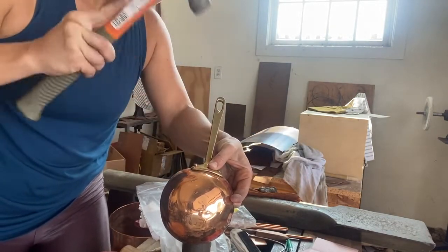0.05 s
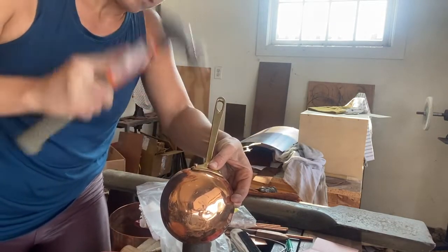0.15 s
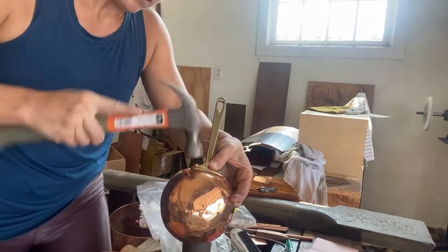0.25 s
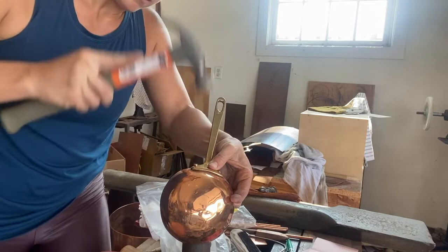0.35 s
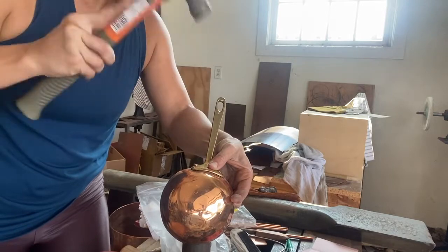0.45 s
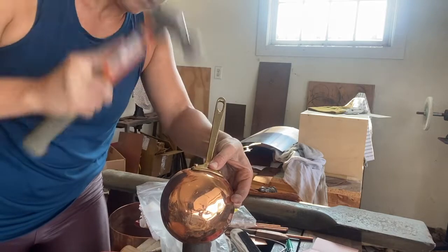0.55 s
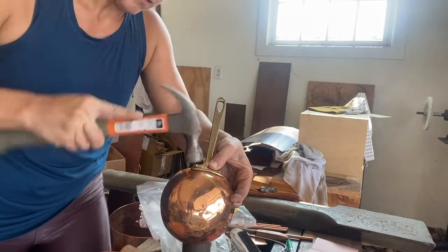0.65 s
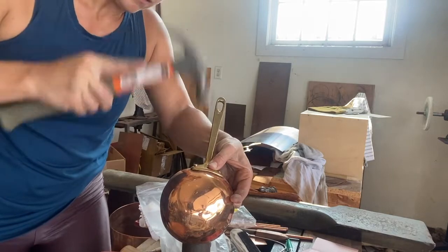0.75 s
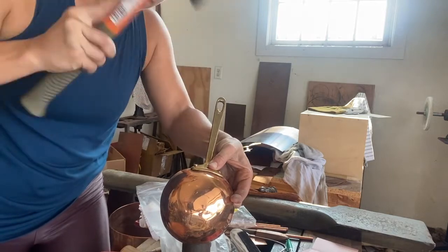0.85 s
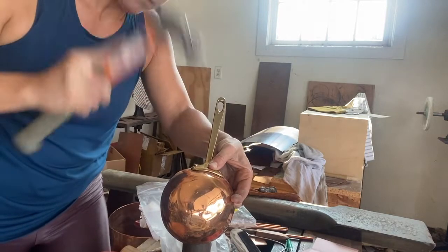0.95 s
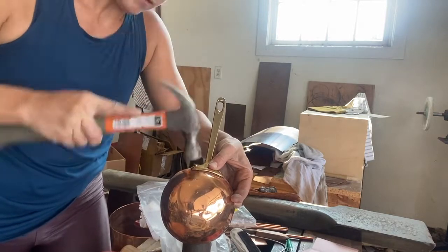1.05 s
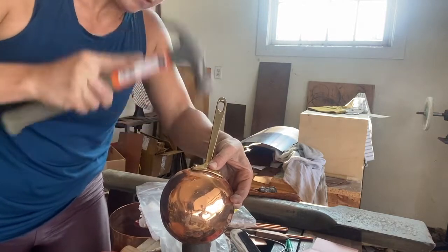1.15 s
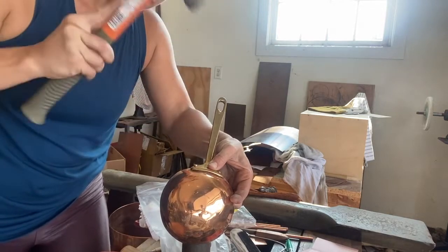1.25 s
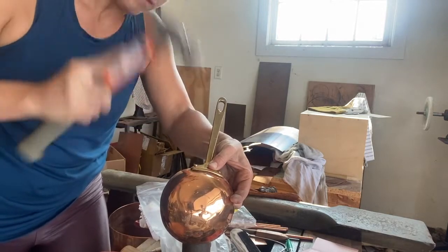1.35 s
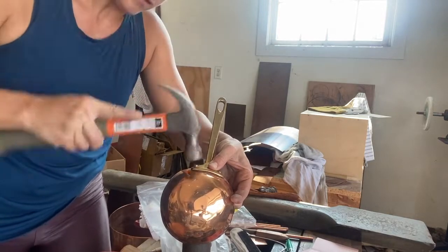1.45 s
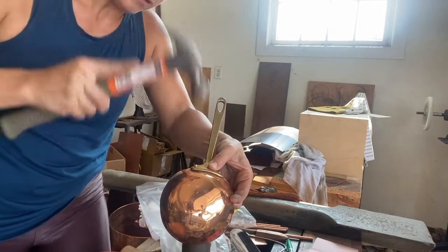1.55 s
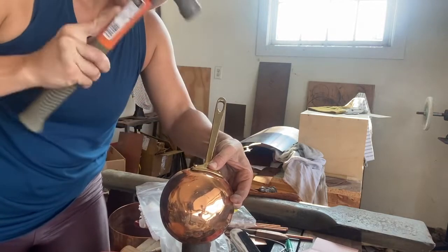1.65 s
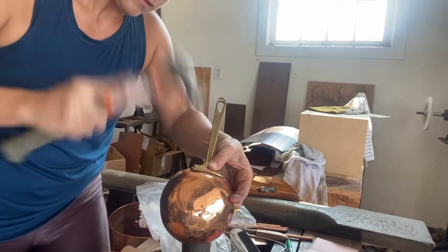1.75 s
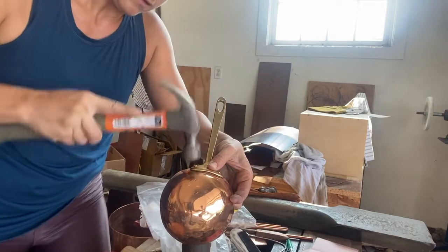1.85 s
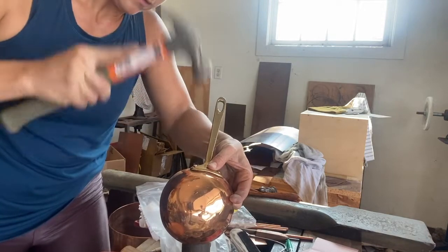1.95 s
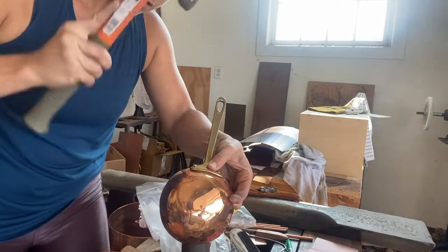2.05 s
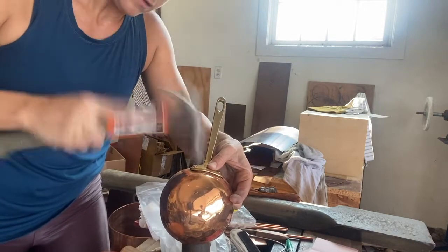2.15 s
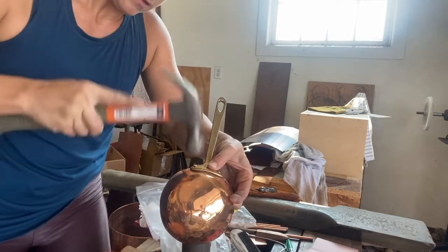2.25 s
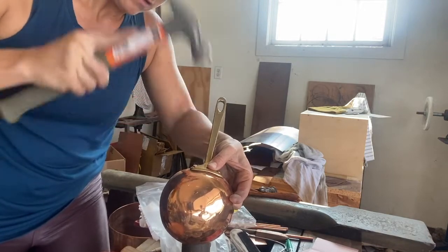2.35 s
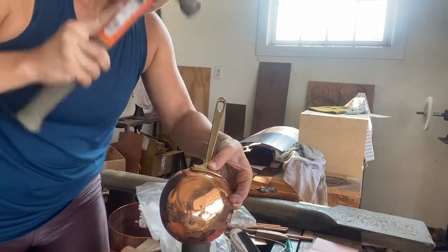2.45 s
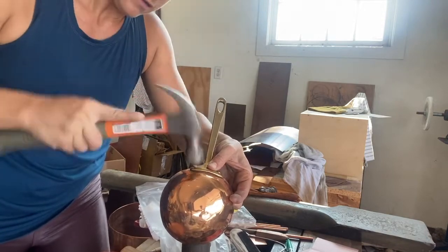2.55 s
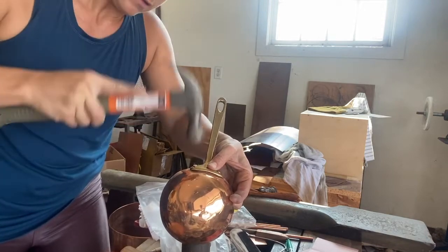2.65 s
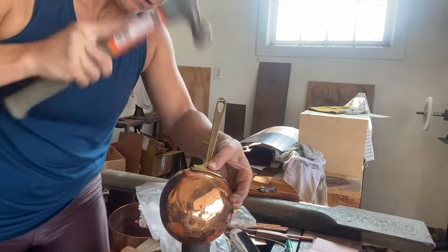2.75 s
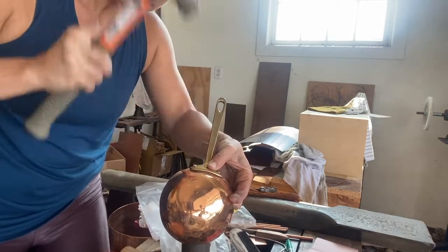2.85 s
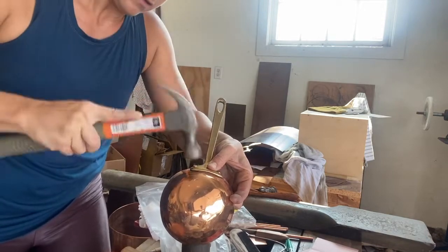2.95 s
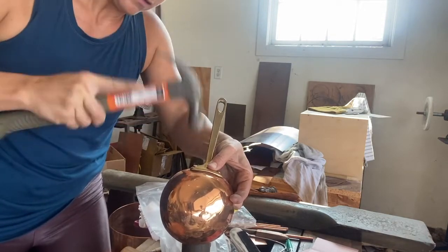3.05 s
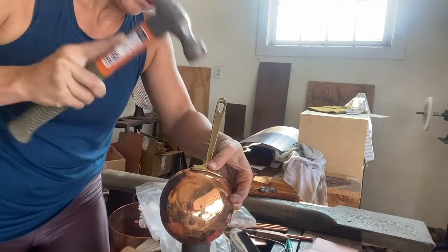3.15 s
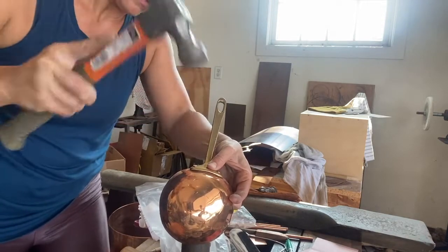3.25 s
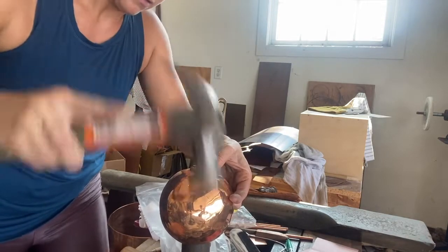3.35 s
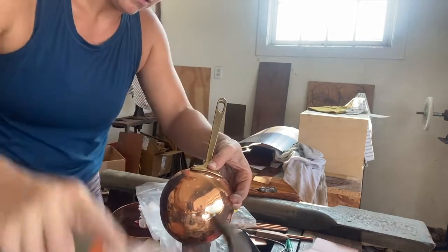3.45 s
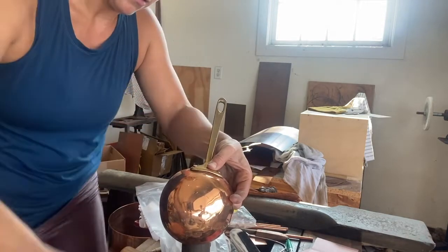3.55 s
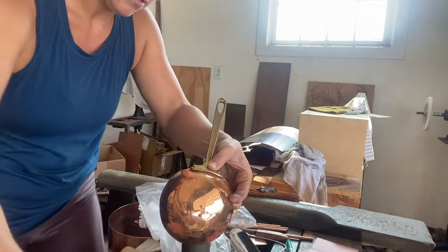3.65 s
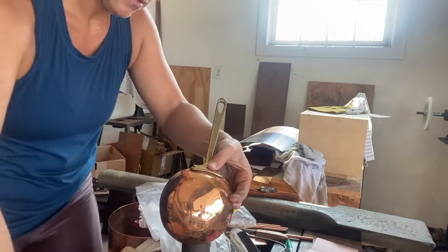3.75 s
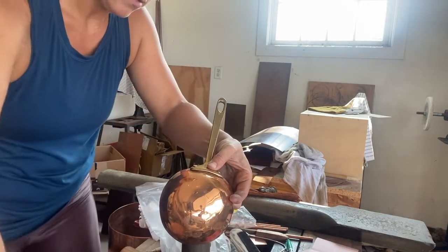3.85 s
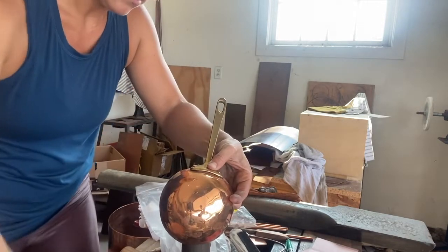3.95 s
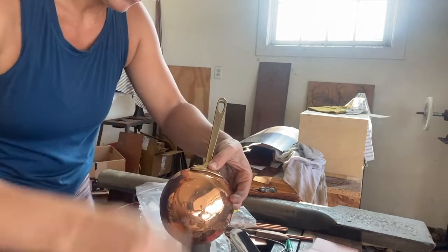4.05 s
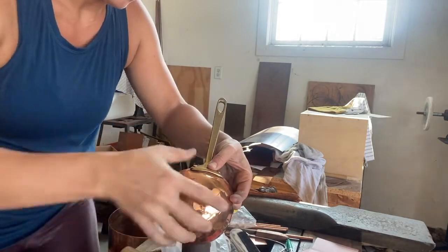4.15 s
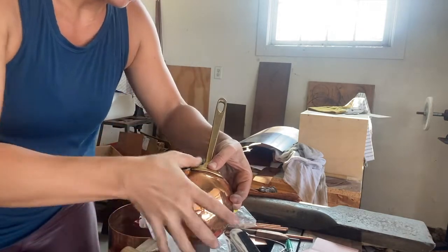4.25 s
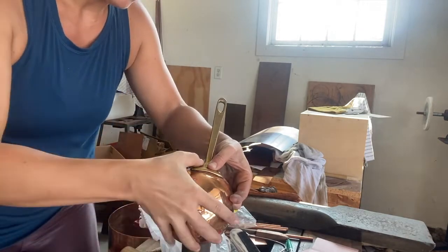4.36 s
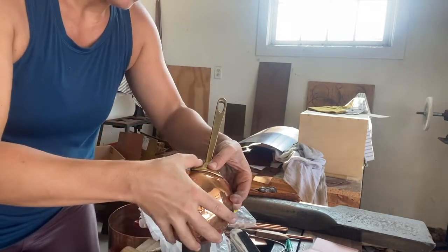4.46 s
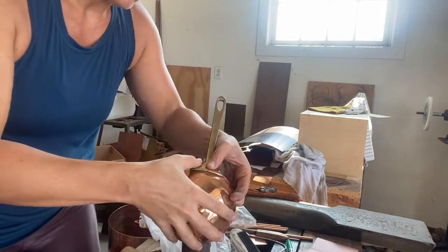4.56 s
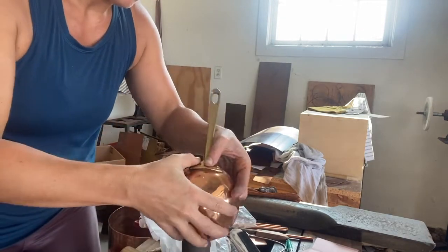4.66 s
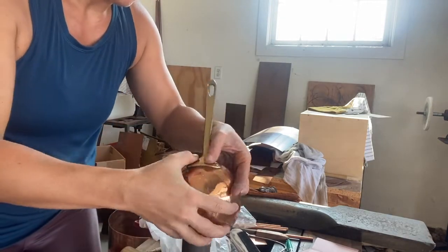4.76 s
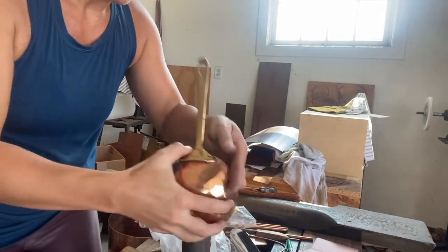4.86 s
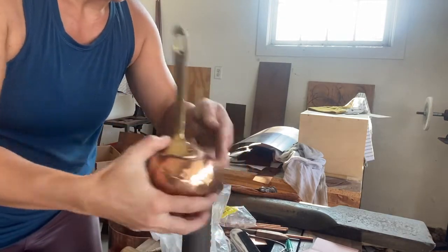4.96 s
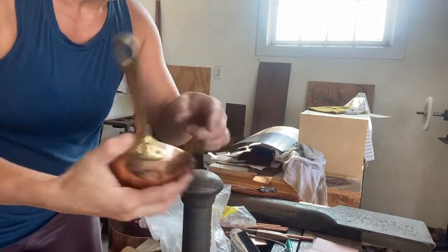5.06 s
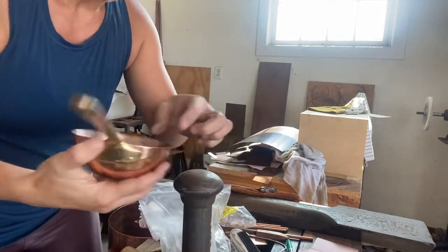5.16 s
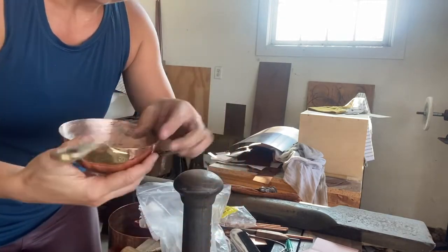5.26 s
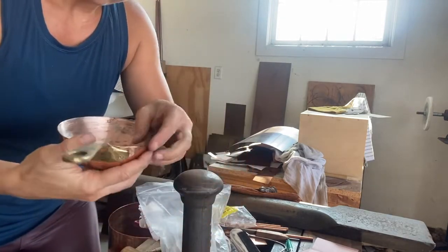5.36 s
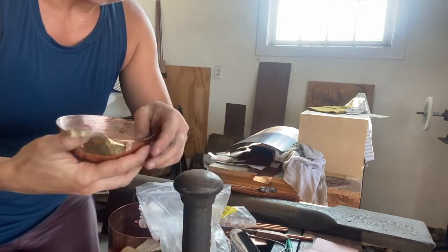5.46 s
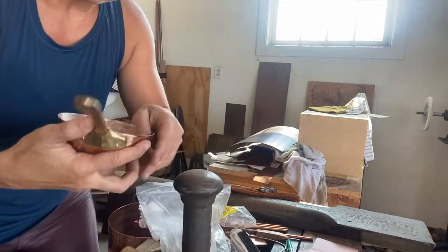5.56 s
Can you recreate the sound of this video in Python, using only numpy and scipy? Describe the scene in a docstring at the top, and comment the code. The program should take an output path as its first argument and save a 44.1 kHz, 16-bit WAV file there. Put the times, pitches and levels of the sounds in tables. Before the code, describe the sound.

A hammer strikes a rivet in a copper bowl on a steel stake, eight hard even clacks with thuds and rattling metal, then near silence.

```python
"""Even hammer blows, each a bright clack over a thud, with loose metal rattling and a workshop ringing after them.
A steel hammer sets a rivet in a copper bowl on a steel stake: noise bursts crack, damped modes ring, a sine drops.
Gain control ducks on loud peaks and lets the room swell back. Then the bowl is lifted off with faint taps,
squeaky gliding slips and soft rubs of the hand. A low throbbing hum and faint room noise lie under it all."""
import sys
import numpy as np
from scipy import signal
from scipy.fft import rfft, irfft, next_fast_len
from scipy.io import wavfile
from scipy.ndimage import uniform_filter1d, minimum_filter1d

SR = 44100
rng = np.random.default_rng(int(sys.argv[2]) if len(sys.argv) > 2 else 0)


def dump(signal):
    """Clip the signal to [-1, 1] and save it as 16-bit WAV at the path in sys.argv[1]."""
    limited = np.clip(np.atleast_2d(signal).T, -1, 1)
    pcm = np.round(limited * 32767).astype(np.int16)
    wavfile.write(sys.argv[1], SR, pcm)


N = 247695
TIME = np.arange(N) / SR  # seconds into the scene
AGE = np.arange(SR) / SR  # seconds since a contact

# All dB columns are relative: the mix adds each layer's own level.
# Hammer blows; the first falls before the scene opens. Each row: start in seconds, force in dB, clank in dB,
# thud in dB, thud rise in seconds, thud resting pitch in Hz, hammer ring in dB, floor boom in dB, knock in dB,
# bowl wall in dB, handle in dB, stake in dB, deep emphasis in Hz, bright emphasis in Hz, crush in seconds,
# room in dB.
HAMMER_BLOWS = [(-.225, 4, 2.5, 0, .01, 55, -1, -2, 0, 0, 0, 0, 400, 8500, .007, -0.5),
                (0.1766, 4, -2.5, -0.5, .0068, 75, -13.5, -3, -5, -1, -6.5, 2, 283, 8300, 0.0084, 0.5),
                (.58, 1.5, 1.5, 3, 0.0096, 55, 1, 6.5, 0.5, -2.5, -3.5, -0.5, 483, 10190, 0.0052, -1),
                (.974, 0.5, 2.5, -2, 0.013, 53.26, -6, 3, -4.5, 0.5, 1.5, 6.5, 452.7, 9970, 0.0057, 0.5),
                (1.372, -1, -0.5, 3, .0072, 47.95, 3.5, -6.5, -2, 2.5, 1.5, -10.5, 403.6, 9340, 0.0065, 0),
                (1.7531, -3.5, 1.5, 3.5, 0.0083, 46.92, -11, 6.5, -3.5, 6, 3.5, -2, 559, 8870, 0.0067, 1),
                (2.1344, -1.8, 0.5, 2.5, 0.012, 63, 0, -4.5, 1.5, 0.5, -7.5, 1.5, 480, 10100, .0075, 1),
                (2.5245, -1.5, 1.5, 2, 0.014, 67.7, -7.5, -13, 0.5, 1, 6.5, 0.5, 663, 7930, 0.0084, 0),
                (2.91, -8.5, 2.5, 2.5, 0.01, 42.06, 4.5, 4.5, 5, 6.5, 4, -0.5, 310, 8300, 0.014, 4.5)]

# Damped modes. Each row: pitch in Hz, level in dB, time to fall 60 dB in seconds.
# The hand-damped bowl, knocked by a blow.
BOWL_KNOCK_MODES = [(156, -4.5, 0.038), (231, -1, 0.06), (277, -7, 0.047), (334, -3, 0.05),
                    (370, 0.5, 0.034), (454.9, -0.5, 0.06), (523.4, 4.5, 0.036), (657, -6, 0.054),
                    (873, -9, 0.024)]
# The hammer head.
HAMMER_HEAD_MODES = [(6621, 0, .25)]
# The floor under the block.
FLOOR_MODES = [(47, -3, 0.6), (57.1, -13, 0.77), (231, -13.5, .8)]
# The bowl wall.
BOWL_WALL_MODES = [(995, -1, .09), (1200, -2, .05), (1260, 0, .07), (1538, 0, .08), (2100, -3, .04)]
# The handle.
HANDLE_MODES = [(2503, -2, .06), (2830, -4, .04), (3300, -1, .04), (3450, -1, .035), (3530, 2, .05),
                (3680, -3, .04), (4130, -5, .04)]
# The stake.
STAKE_MODES = [(5250, -6, .04), (5858, -3, .05), (7135, -7, .06)]
# The rivet.
RIVET_MODES = [(7970, -3, .04), (8125, 1, .055), (8290, -3, .04), (8660, -4, .04), (8775, -1, .05),
               (9020, -4, .035), (9280, -3, .05), (9580, -3, .035), (9950, -2, .04), (10320, -1, .045),
               (10560, -6, .03), (11290, -11, .07), (12087, -8, .04), (12367, -6, .04), (12760, -11, .05),
               (13556, -10, .04), (14130, -9, .04), (15300, -9, .025)]
# Loose metal on the block, shaken by each blow.
LOOSE_METAL_MODES = [(1435, -2, .12), (1523, -2, .14), (1610, -5, .06), (1701, -2, .09), (1927, -5, .06),
                     (2336, -5, .06), (2557, -8, .05), (2826, -7, .04), (3295, -8, .04)]
# The bowl's faint ring when it touches the stake.
BOWL_TOUCH_MODES = [(1114, -1, .06), (1335, -3, .08), (1723, -15, .16), (2600, -24, .35), (3310, -10, .1),
                    (4130, -15, .1), (5860, -16, .12), (7230, -15, .15), (8750, -16, .17)]
# The bowl once it is freed.
FREE_BOWL_MODES = [(3000, -9, .3), (5900, -3, .45), (6550, 2, .4)]

# Noise colours. Each row: frequency in Hz, density in dB per Hz.
# The clank of a blow.
CLANK_COLOUR = [(100, -16.5), (300, 2), (700, 0), (1400, -2.5), (2100, -4), (3400, -1.5), (4700, -3.5),
                (5600, -7.5), (6500, -2.5), (8000, -9.5), (12000, -39.5)]
# The bright crack on the rivet.
CRACK_COLOUR = [(2000, -38.5), (7200, -11.5), (8100, 3), (9000, 1), (10300, -3), (11000, -12.5),
                (12300, -0.5), (13200, -5.5), (14500, -6), (15600, -5.5), (16500, -26)]
# The block and the things on it.
SHUDDER_COLOUR = [(60, -12), (200, 4.5), (500, -1), (1000, -1.5), (1600, -16.5), (4000, -30.5)]
# The scuff of each loose contact.
SCUFF_COLOUR = [(600, -32), (1350, -9.5), (1700, 2.5), (2400, 2.5), (3200, -9.5), (6000, -15.5),
                (14000, -32)]
# The room's answer.
ROOM_COLOUR = [(40, -19), (120, -2), (300, 2), (800, 3), (1200, -1), (1550, 3.5), (2000, -0.5),
               (3200, -2.5), (5200, -7.5), (7300, -4), (8900, 1.5), (10500, -12), (13000, -2),
               (15600, -16.5), (16200, -30.5)]
# The faint room noise.
QUIET_COLOUR = [(20, -26), (43, -5.5), (65, 0), (123, -7.5), (150, -21), (193, -12), (230, -21.5),
                (390, -31), (740, -33.5), (1500, -49), (3000, -46), (6000, -48), (8400, -44), (15500, -55)]
# The bowl tapping the stake.
TAP_COLOUR = [(290, -44.5), (500, -18), (860, -22), (1150, 5.5), (1600, -16), (2200, -23), (2600, -21),
              (3500, -25), (4600, -30), (6000, -35), (6600, -38), (8700, -24), (14000, -37)]
# The small click of every touch.
TICK_COLOUR = [(400, -15), (1500, 0), (3400, 0), (5000, -14), (8500, -9), (15000, -22)]
# A hand rubbing on metal.
SKIN_COLOUR = [(1000, -10), (2800, -19), (4200, -10), (5500, -19), (8800, -10), (15000, -10)]
# A soft bump.
BUMP_COLOUR = [(100, -14), (350, 5), (550, -5), (1000, -20), (4000, -35)]

# How the room dies away. Each row: frequency in Hz, time to fall 60 dB in seconds.
ROOM_T60 = [(100, .5), (400, 0.45), (1500, 0.56), (5000, 0.51), (9000, 0.42), (14000, .39)]

# The microphone pair.
# Near sounds. Each row: frequency in Hz, left-right likeness from -1 to 1.
NEAR_LIKENESS = [(100, 0.66), (280, 0.9), (1400, 0.65), (2400, 0.24), (4500, .4), (6500, .75), (8000, 0.96)]
# Room sounds. Each row: frequency in Hz, left-right likeness from -1 to 1.
ROOM_LIKENESS = [(130, 0.95), (700, 0.3), (1500, 0.75), (3000, 0.25), (5500, 0.15), (6500, .5),
                 (7500, 0.96)]
# Balance of the blows. Each row: frequency in Hz, left minus right in dB.
NEAR_BALANCE = [(60, -.5), (110, -2), (200, -7), (400, -4.5), (1200, -.5), (2400, -3), (5000, -3.5),
                (8000, 0)]
# Blows alone: their bass reaches the right one first. Each row: frequency in Hz, lead of the left in radians.
NEAR_LEAD = [(40, -0.11), (80, -0.75), (500, -1.1), (750, 0.3)]
# The whole mix. Each row: frequency in Hz, lead of the left in radians.
LEFT_LEAD = [(1400, 0), (2330, .9), (4200, 1.1), (5000, 3.4), (6500, 4.8), (7900, 6.3), (9000, 7.3),
             (10500, 9.4), (13000, 12.6), (15400, 15.7)]

# The bowl touching the stake as it is handled. Each row: start in seconds, level in dB, time to fall 60 dB
# in seconds.
BOWL_TAPS = [(4.436, -77, .035), (4.53, -80, 0.062), (4.619, -55.5, 0.064), (4.629, -57, 0.038),
             (4.647, -55, 0.065), (4.663, -63, 0.046)]
# The bowl squeaking off the stake. Each row: start in seconds, length in seconds, first pitch in Hz,
# last pitch in Hz, level in dB, roughness as a fraction of the pitch (rms).
SQUEAKY_SLIPS = [(4.775, .03, 2300, 2850, -84, .03), (4.803, .021, 3200, 4650, -75, .035),
                 (4.817, .014, 4900, 3300, -76, .03), (4.826, .055, 4450, 4100, -81, .05),
                 (4.833, .05, 3400, 2250, -65.5, .055), (4.94, .025, 4100, 4700, -82, .06),
                 (4.968, .042, 3700, 2700, -76, .11), (5.008, .032, 2900, 3600, -83, .09),
                 (5.05, .02, 3200, 2950, -86, .08)]
# Hands rubbing over the tools and the copper. Each row: peak time in seconds, rise in seconds, fall in seconds,
# level in dB, strongest frequency in Hz.
HAND_RUBS = [(3.74, .01, 0.046, -73.5, 2200), (4.34, .04, 0.068, -83, 4400), (4.58, 0.059, .04, -82, 3390),
             (4.9, .1, .17, -85, 8600), (5.211, .03, 0.056, -76, 8710), (5.365, .025, 0.041, -85, 3200)]
# The clearest clinks of the loose metal. Each row: start in seconds, level in dB, strongest frequency in Hz.
CLEAR_CLINKS = [(.005, -30, 1544), (0.261, -16, 1410), (.334, -21.5, 1434), (.409, -28, 1696),
                (1.134, -24, 1740), (1.154, -25, 2320), (1.461, -17.5, 1713), (1.554, -29, 1472),
                (1.837, -25.5, 1780), (1.91, -30, 1457), (2.283, -26, 1440), (2.336, -36.5, 1490),
                (2.684, -30, 1492), (2.713, -33.5, 1500), (3.002, -21.5, 1395), (3.098, -44, 1680)]

# Blow layers
CRACK_DB, CRACK_DB_PER_S = -0.5, 0.82  # the crack changes slowly as the rivet flattens
CLANK_DB, KNOCK_DB, HAMMER_DB = 3.5, 4.5, -13.5
WALL_DB, HANDLE_DB, STAKE_DB, RIVET_DB = -7.5, -7, -3.5, 0
BRIGHT_DB, BRIGHT_WIDTH_HZ = 7, 1000  # where the hammer lands decides which rivet modes speak most
DEEP_DB, DEEP_WIDTH_HZ = 7, 110  # the grip on the bowl favours some of its low modes
THUD_DB, THUD_QUICK_CYCLES, THUD_SETTLE_S = 3, 4, .005  # extra swings at the start; time for the pitch to settle
BLOCK_LAG_S = 0.003  # the floor gives way after the blow
ROOM_SAME = .7  # share of the room's power that is the same for every blow

# Loose metal
RATTLE_DB, RATTLE_FALL_DB_PER_S = -18, 68.5
RATTLE_FROM_S, RATTLE_TO_S = .05, 0.27  # after the blow
SCUFF_DB, SCUFF_T60_S = 2, 0.045

# Handling
BUMP_S, BUMP_DB, BUMP_T60_S = 3.908, -68, 0.15
GLANCE_S, GLANCE_DB = 5.195, -86  # a finger brushes the freed bowl and it rings
TOUCH_DB, TICK_DB, TICK_T60_S = -11.5, -82, .04
RUB_PEAK_DB, RUB_WIDTH_HZ = 9, 720

# Recording band
LOW_CUT_HZ, TOP_HZ = 18, 16300


def amp(db):
    """Decibels to gain."""
    return 10 ** (np.asarray(db) / 20)


def unit(x):
    """Scale to rms 1."""
    return x / np.sqrt(np.mean(x ** 2) + 1e-20)


def along(points, hz):
    """Read (Hz, value) points on a log frequency axis."""
    f, v = np.transpose(points)
    return np.interp(np.log(hz + 1), np.log(f + 1), v)


def hump(hz, centre, width):
    """A bell-shaped emphasis, 1 at its centre."""
    return np.exp(-.5 * ((hz - centre) / width) ** 2)


def filtered(x, response):
    """Shape x by a response of frequency."""
    n = x.shape[-1]
    m = next_fast_len(n + 8192)
    return irfft(rfft(x, m) * response(np.fft.rfftfreq(m, 1 / SR)), m)[..., :n]


def noise(colour, likeness, size):
    """Stereo noise of rms 1 with a given colour; mid and side shares set the left-right likeness."""
    hz = np.fft.rfftfreq(size, 1 / SR)
    turn = np.arccos(np.clip(along(likeness, hz), -1, 1)) / 2
    spectra = rfft(rng.standard_normal((2, size))) * amp(along(colour, hz))
    mid, side = irfft(spectra * [np.cos(turn), np.sin(turn)], size)
    return unit(np.array([mid + side, mid - side]))


def add(track, s, sound):
    """Mix a sound into the track from time s on."""
    start = round(s * SR)
    part = sound[..., max(-start, 0):N - start]
    track[:, max(start, 0):][:, :part.shape[-1]] += part


def ring(modes, attack, scatter_db, detune, jitter):
    """Damped modes in stereo; each strike lands a little differently and shifts their levels, pitches and phases."""
    hz, db, t60 = np.transpose(modes)[:, :, None]
    size, shift, phase, side = rng.standard_normal((4, len(modes), 1))
    # each mode meets the two microphones out of step
    apart = side * np.arccos(np.clip(along(NEAR_LIKENESS, hz), -1, 1)) / 2
    angle = 2 * np.pi * hz * (1 + detune * shift) * AGE + jitter * phase
    onset = 1 - np.exp(-(AGE / attack) ** 2)
    fade = amp(db + scatter_db * size - 60 * AGE / t60) * onset
    return np.array([np.sum(fade * np.sin(angle + turn), axis=0) for turn in (apart, -apart)])


def background():
    """Faint room noise and a low hum whose level throbs."""
    throb = amp(3.7 * np.sin(2 * np.pi * 17.0 * TIME))
    hum = throb * np.sin(2 * np.pi * 62 * TIME)
    return amp(-67.0) * noise(QUIET_COLOUR, ROOM_LIKENESS, size=N) + amp(-72.0) * unit(hum)


def workshop(patchy_db):
    """One tail of the cluttered room: uneven in time and pitch, each band dying at its own rate."""
    hz, t, z = signal.stft(noise(ROOM_COLOUR, ROOM_LIKENESS, size=SR), SR, nperseg=1024)
    clumps = unit(uniform_filter1d(rng.standard_normal(z.shape), size=6, axis=1))
    fade_db = patchy_db * clumps - 60 * t / along(ROOM_T60, hz)[:, None]
    tail = signal.istft(z * amp(fade_db), SR, nperseg=1024)[1][:, :SR]
    return tail * (1 - np.exp(-AGE / 0.003))


def rubbing():
    """Each stroke of the hand swells and fades as a soft hiss with a colour of its own."""
    out = np.zeros((2, N))
    t = AGE - .5  # the peak sits mid-buffer
    for s, rise, fall, db, peak_hz in HAND_RUBS:
        skin = noise(SKIN_COLOUR, ROOM_LIKENESS, size=SR)
        hiss = filtered(skin, lambda hz: amp(RUB_PEAK_DB * hump(hz, peak_hz, RUB_WIDTH_HZ)))
        swell = np.exp(-np.maximum(-t / rise, t / fall))
        add(out, s - .5, amp(db) * swell * unit(hiss))
    return out


def squeaks(room_db):
    """Each slip swells and stops as the metal grips again; its pitch glides with the sliding speed and stutters."""
    out = np.zeros((2, N))
    for s, length, first_hz, last_hz, db, rough in SQUEAKY_SLIPS:
        u = np.linspace(0, 1, round(length * SR))
        stutter = 1 + rough * unit(uniform_filter1d(rng.standard_normal((2, len(u))), size=28))
        pitch = (first_hz + (last_hz - first_hz) * u) * stutter
        swell = np.sin(np.pi * u * np.sqrt(u))
        add(out, s, amp(db) * swell * np.sin(2 * np.pi * np.cumsum(pitch, axis=1) / SR))
    tail = workshop(patchy_db=2.5)
    room = signal.fftconvolve(out, tail / np.linalg.norm(tail[0]), axes=1)[:, :N]
    return out + amp(room_db) * room


def handling():
    """A soft bump, likely the hammer laid down; the bowl taps the stake, scrapes off it and is turned in the fingers."""
    out = np.zeros((2, N))
    bump_fade = amp(BUMP_DB - 60 * AGE / BUMP_T60_S) * (1 - np.exp(-AGE / .004))
    add(out, BUMP_S, bump_fade * noise(BUMP_COLOUR, ROOM_LIKENESS, size=SR))
    for s, db, t60 in BOWL_TAPS:
        fade = amp(-60 * AGE / t60) + amp(-20.5 - 60 * AGE / 0.42)  # contact, then the room
        onset = 1 - np.exp(-AGE / 0.00088)
        touch = ring(BOWL_TOUCH_MODES, attack=0.0011, scatter_db=5.0, detune=0.0026, jitter=np.pi)
        add(out, s, amp(db) * noise(TAP_COLOUR, ROOM_LIKENESS, size=SR) * fade * onset)
        add(out, s, amp(db + TOUCH_DB) * touch)
        add(out, s, amp(TICK_DB - 60 * AGE / TICK_T60_S) * noise(TICK_COLOUR, ROOM_LIKENESS, size=SR))
    glance = ring(FREE_BOWL_MODES, attack=.012, scatter_db=5, detune=0, jitter=0)
    add(out, GLANCE_S, amp(GLANCE_DB) * glance)
    return out + squeaks(room_db=-6.5) + rubbing()


def rattle(count):
    """Loose pieces chatter after each blow, later contacts weaker; now and then one clinks clearly."""
    out = np.zeros((2, N))
    chatter = []
    for s, force_db, *_ in HAMMER_BLOWS:
        for wait in RATTLE_FROM_S + (RATTLE_TO_S - RATTLE_FROM_S) * rng.random(count):
            db = force_db + RATTLE_DB - RATTLE_FALL_DB_PER_S * wait
            chatter.append((s + wait, db, rng.uniform(1200, 2800)))
    for s, db, peak_hz in CLEAR_CLINKS + chatter:
        piece = [(hz, level - 6.5 + 5 * hump(hz, peak_hz, 110), t60) for hz, level, t60 in LOOSE_METAL_MODES]
        scuff = amp(SCUFF_DB - 60 * AGE / SCUFF_T60_S) * noise(SCUFF_COLOUR, ROOM_LIKENESS, size=SR)
        clink = ring(piece, attack=0.00075, scatter_db=3, detune=0.0025, jitter=np.pi)
        add(out, s, amp(db - 4.0) * (scuff + clink))
    return out


def burst(attack, crush):
    """Envelope of a blow: full while the rivet yields, then falling fast into nearby reflections."""
    return (1 - np.exp(-AGE / attack)) / np.hypot(1, (AGE / crush) ** 2) * amp(-60 * AGE / 0.4)


def thump(rise, rest_hz):
    """The stake sinks into its block: one solid push that drops in pitch as the heavier mass takes it up."""
    u = AGE / rise
    cycles = rest_hz * AGE + THUD_QUICK_CYCLES * (1 - np.exp(-AGE / THUD_SETTLE_S))
    return (u * np.exp(1 - u)) ** 2 * np.sin(2 * np.pi * cycles)


def hammering():
    """Each blow cracks on the rivet, rings the metal, and drives the stake into its block and the floor."""
    near, far = np.zeros((2, N)), np.zeros((2, N))
    answer = workshop(patchy_db=2.5)
    for (s, force_db, clank_db, thud_db, thud_rise, thud_hz, ring_db, boom_db, knock_db,
         wall_db, handle_db, stake_db, deep_hz, bright_hz, crush, room_db) in HAMMER_BLOWS:
        crack_db = CRACK_DB + CRACK_DB_PER_S * s
        crack = amp(5 + crack_db) * noise(CRACK_COLOUR, NEAR_LIKENESS, size=SR) * burst(0.0011, crush)
        clank = amp(CLANK_DB + clank_db) * noise(CLANK_COLOUR, NEAR_LIKENESS, size=SR) * burst(0.00098, crush)

        rivet = [(hz, db + BRIGHT_DB * hump(hz, bright_hz, BRIGHT_WIDTH_HZ), t60) for hz, db, t60 in RIVET_MODES]
        parts = [(BOWL_WALL_MODES, WALL_DB + wall_db), (HANDLE_MODES, HANDLE_DB + handle_db),
                 (STAKE_MODES, STAKE_DB + stake_db), (rivet, RIVET_DB + crack_db)]
        metal = sum(amp(db) * ring(modes, attack=.001, scatter_db=2, detune=.001, jitter=np.pi)
                    for modes, db in parts)
        head = ring(HAMMER_HEAD_MODES, attack=0.0012, scatter_db=1, detune=0, jitter=0)
        head = amp(HAMMER_DB + ring_db) * head

        # the heavier parts take longer to get moving
        bowl = [(hz, db + DEEP_DB * hump(hz, deep_hz, DEEP_WIDTH_HZ), t60) for hz, db, t60 in BOWL_KNOCK_MODES]
        knock = ring(bowl, attack=0.0043, scatter_db=0.0, detune=0.015, jitter=1.0)
        knock = amp(KNOCK_DB + knock_db) * knock
        thud = amp(THUD_DB + thud_db) * thump(thud_rise, thud_hz)
        boom = ring(FLOOR_MODES, attack=0.017, scatter_db=0.5, detune=.01, jitter=.25)
        boom = amp(-26.0 + boom_db) * boom
        shudder_fade = amp(-5.5 - 60 * AGE / 0.26) * (1 - np.exp(-AGE / 0.0057))
        shudder = shudder_fade * noise(SHUDDER_COLOUR, ROOM_LIKENESS, size=SR)

        add(near, s, amp(force_db) * (crack + clank + metal + head + knock + thud + shudder))
        add(near, s + BLOCK_LAG_S, amp(force_db) * boom)
        tail = np.sqrt(ROOM_SAME) * answer + np.sqrt(1 - ROOM_SAME) * workshop(patchy_db=0.5)
        add(far, s, amp(force_db + room_db - 9.5) * tail)
    # split the level and phase differences evenly between left and right
    half = np.array([[.5], [-.5]])
    placed = filtered(near, lambda hz: amp(half * along(NEAR_BALANCE, hz)) * np.exp(1j * half * along(NEAR_LEAD, hz)))
    return far + placed


def scene():
    """All sources at the microphones; the treble reaches the left one first."""
    sound = hammering() + rattle(count=5) + handling() + background()
    return filtered(sound, lambda hz: np.exp(.5j * along(LEFT_LEAD, hz) * np.array([[1], [-1]])))


def gain_control(x, ceiling_db, hold, release_db):
    """Duck at once on a peak, hold for some seconds, then recover by release_db a second."""
    power = np.abs(uniform_filter1d(np.mean(x ** 2, axis=0), size=128))
    over = np.maximum(20 * np.log10(np.sqrt(power) + 1e-9) - ceiling_db, 0)
    span = max(int(hold * SR), 2)
    held = -minimum_filter1d(-over, span, origin=(span - 1) // 2, mode="constant")
    cut = np.maximum.accumulate(held + release_db * TIME) - release_db * TIME
    # start each duck slightly early and smooth its edge
    gain_db = uniform_filter1d(minimum_filter1d(-cut, size=128), size=64)
    return x * amp(gain_db)


def record(dry):
    """The microphone sheds the deepest bass; its soft overload point lies far above the blows, so they pass
    unrounded. Gain control and the band limit follow."""
    top = amp(36.0)
    low_cut = signal.butter(2, LOW_CUT_HZ, "highpass", fs=SR, output="sos")
    picked_up = signal.sosfilt(low_cut, dry)
    passed = top * np.tanh(picked_up / top)
    levelled = gain_control(passed, ceiling_db=-10.5, hold=0.081, release_db=156.5)
    return filtered(levelled, lambda hz: 1 / np.sqrt(1 + np.minimum(hz / TOP_HZ, 2) ** 200))


dry = scene()
out = record(dry)
dump(out)
```